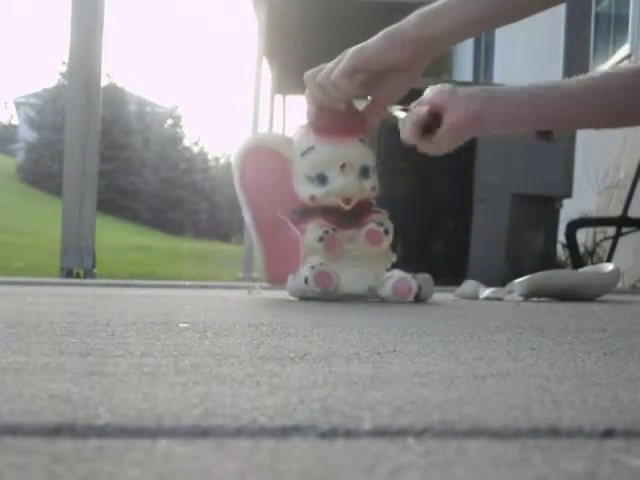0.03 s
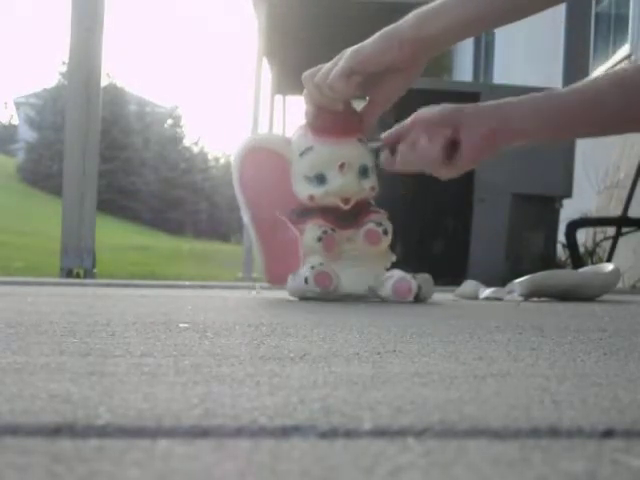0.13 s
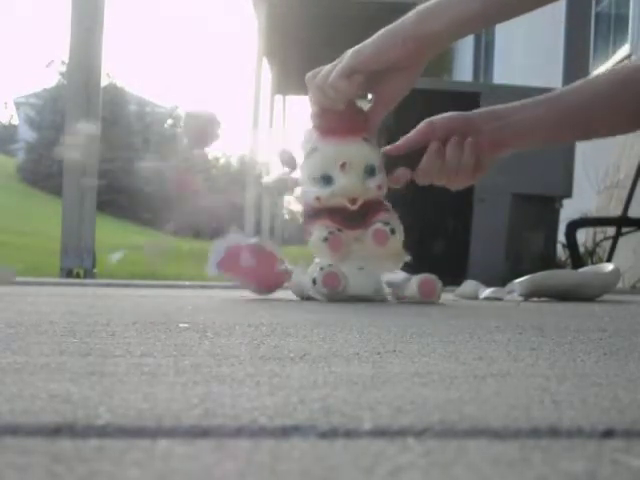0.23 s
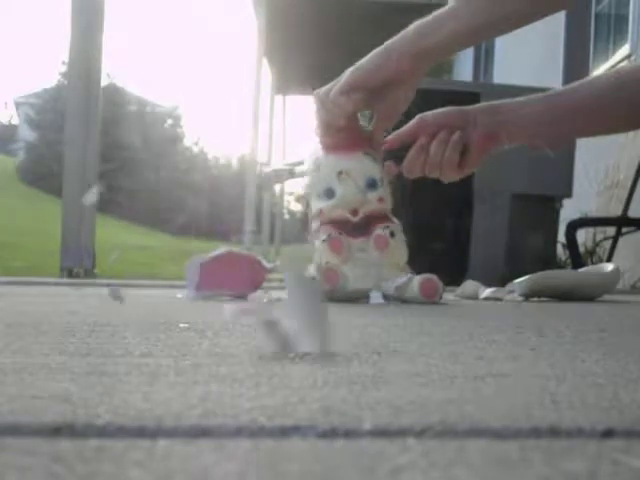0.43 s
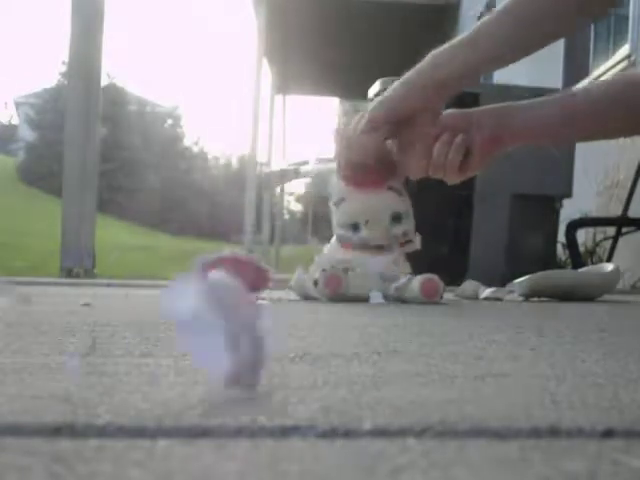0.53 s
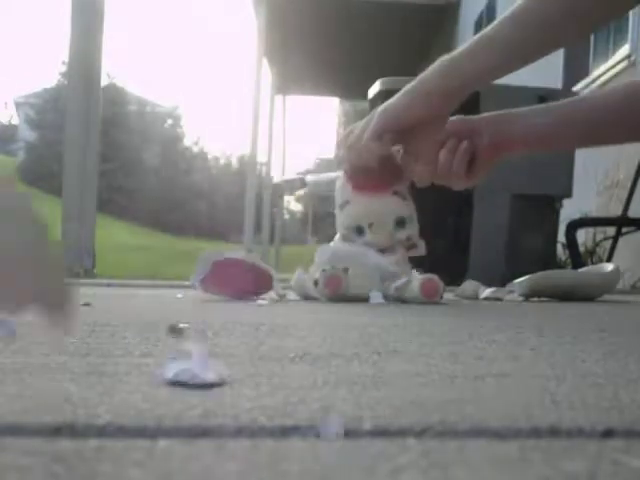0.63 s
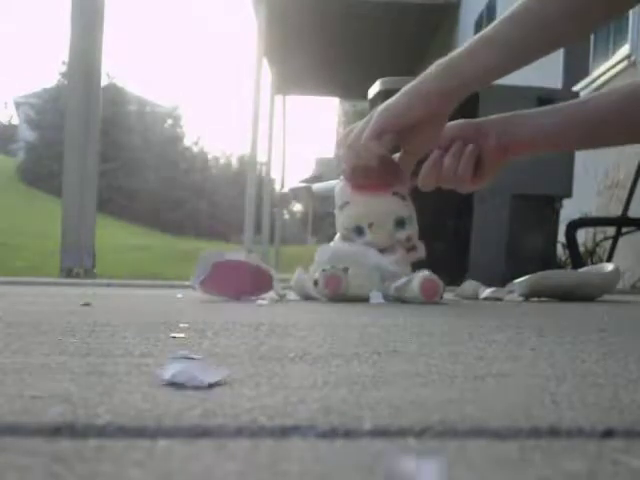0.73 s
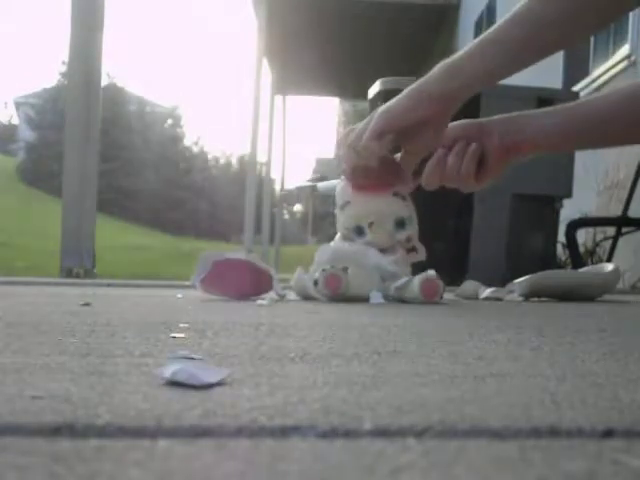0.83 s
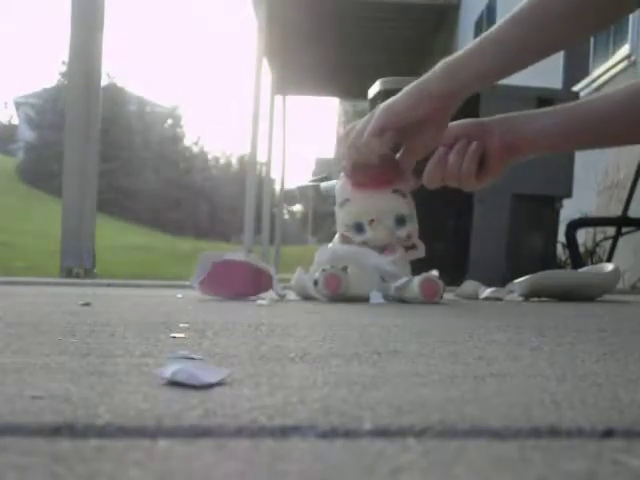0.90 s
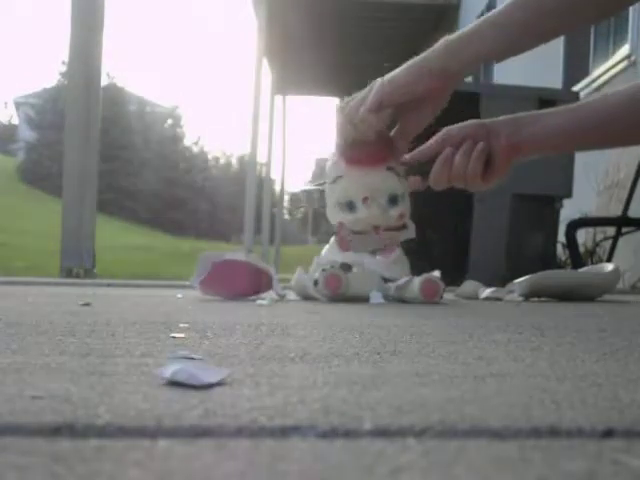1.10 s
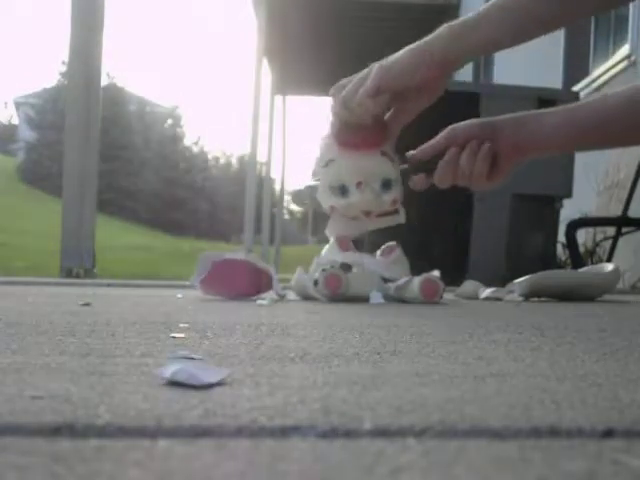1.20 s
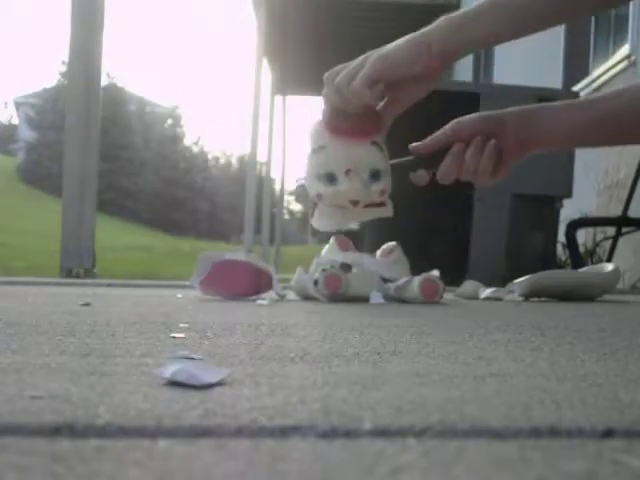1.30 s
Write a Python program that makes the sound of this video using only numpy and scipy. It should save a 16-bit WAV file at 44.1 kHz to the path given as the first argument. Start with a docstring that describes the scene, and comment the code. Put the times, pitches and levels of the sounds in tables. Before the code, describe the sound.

A hollow ceramic figurine breaks with one sharp crack. Shards clink and grit scatters on a concrete patio as a short echo returns. The dull microphone briefly overloads, with a faint cricket and low outdoor rumble behind.

```python
"""A cricket chirps over a low outdoor rumble. Then a hollow ceramic figurine bursts on a concrete
patio: a sharp crack, with a push of air that overloads the dull microphone. The shell rings briefly
while small chips tick, grit rains down and shards clink on the slab. The bang comes back from the
houses, the last pieces land, and the cricket chirps on."""
import sys
import numpy as np
from scipy import signal
from scipy.fft import rfft, irfft
from scipy.io import wavfile
from scipy.ndimage import uniform_filter1d

SR = 44100
rng = np.random.default_rng(int(sys.argv[2]) if len(sys.argv) > 2 else 0)


def persist_wave(psi):
    """Save psi, clipped to +-1, as 16-bit WAV."""
    counts = np.round(np.clip(psi, -1, 1) * 32767).astype(np.int16)
    wavfile.write(sys.argv[1], SR, np.atleast_2d(counts).T)


N = 59535
T = np.arange(N) / SR
BREAK_S = 0.2202

# tone colour of the outdoor background: (frequency [Hz], relative level [dB])
AIR_COLOUR = [(15, 0), (28, -0.5), (45, -6), (66, 2), (95, -13), (128, -6), (180, -15), (300, -22.5),
              (600, -28.5), (1200, -28), (2500, -40), (4800, -40.5), (7000, -30.5)]
# cricket chirps: (time [s], level [dB])
CRICKET_CHIRPS = [(0.077, -55.5), (0.623, -56.5), (1.095, -58)]
# ringing tones of the hollow shell: (pitch [Hz], relative level [dB], time to fade by 60 dB [s])
SHELL_TONES = [(591.7, -7.5, 0.086), (918, 3.5, 0.083), (1133, -8, 0.22), (1206, -7, 0.047),
               (1508, -2, 0.11), (1624, -5, .17), (1825, -9.5, .13), (2034, 5, 0.11), (2275, 1.5, 0.15),
               (2342, -2.5, .13), (2498, -3.5, 0.16), (2827, -2, 0.15), (3106, -1, 0.07),
               (3324, -7.5, 0.13)]
# tone colour of the bang washing around the patio: (frequency [Hz], relative level [dB])
WASH_COLOUR = [(100, -28), (330, -8.5), (420, -8), (800, -7), (1100, -3), (1500, -6.5), (2300, -4.5),
               (3300, -8.5), (5000, -10), (7000, -10)]
# chips ticking on the concrete: (time [s], level [dB], pitch [Hz])
CHIP_TICKS = [(0.2235, 8, 1400), (.2426, -5, 2160), (0.432, -7.5, 2260), (0.4324, -14.5, 3070),
              (0.4369, -15.5, 2300), (0.444, -15.5, 2300), (0.5734, -10.5, 3400), (0.5862, -17.5, 3300),
              (.6275, -29, 3500), (.6380, -23.5, 3510), (0.6492, -21, 2450), (0.7879, -13.5, 3800),
              (0.8194, -27.5, 4030), (0.8382, -33, 3800), (0.843, -28.5, 3060), (0.848, -32, 3200),
              (0.8887, -16, 2020), (.9170, -37, 3300), (.9455, -20, 2400), (1.0533, -20.5, 3200),
              (1.2416, -29, 2200), (1.2435, -19, 3490), (1.288, -38.5, 3500)]
# loudness of the falling grit: (time [s], level [dB])
GRIT_LEVELS = [(.2, -69), (.23, -45), (.3, -43), (.39, -69), (.44, -43), (.5, -49.5), (.56, -42.5),
               (.7, -66.5), (.84, -72.5), (.98, -73), (1.04, -64), (1.12, -67), (1.35, -74)]
# shards clinking: (time [s], level [dB], pitch [Hz], fade time [s], roughness [0-1])
SHARD_HITS = [(0.2328, -17.5, 2190, 0.066, 0.42), (0.2419, -18, 4500, 0.0075, 0.2),
              (0.2974, -29.5, 4900, 0.026, 0.65), (0.3112, -25.5, 1930, 0.036, 0.11),
              (0.3118, -27, 3500, 0.023, 0.47), (0.375, -40.5, 1970, 0.069, 0.23),
              (0.4208, -35, 4560, 0.021, 0.66), (.4210, -36, 3390, .025, 0.25),
              (.4460, -31.5, 2284, 0.04, .7), (0.4766, -38, 4680, 0.032, 0.65),
              (0.4894, -30, 3876, 0.038, 0.3), (0.489, -31, 2860, 0.024, 0.54),
              (0.5123, -23.5, 4320, .022, 0.32), (0.514, -19.5, 3055, 0.027, 0.03),
              (0.5262, -25.5, 4840, 0.024, 0.7), (0.5285, -21.5, 4320, 0.017, 0.4),
              (0.5307, -20, 3500, 0.024, 0.35), (0.5515, -28, 4150, 0.023, 0.03),
              (0.564, -31, 1960, .02, 0.43), (0.663, -46, 2000, 0.079, 0.3),
              (0.8423, -46.5, 1500, 0.024, 0.63), (0.8891, -32, 2530, 0.0064, 0.2),
              (.8945, -47.5, 2260, 0.13, 0.8), (1.028, -37, 1220, 0.045, 0.55),
              (1.0310, -42, 1600, 0.097, 0.31), (1.0319, -40.5, 2460, 0.038, 0.5),
              (1.0290, -43.5, 3540, 0.062, 0.43), (1.0630, -41, 545, 0.013, .3),
              (1.0650, -44.5, 327, 0.1, 0.25), (1.148, -50, 1200, .05, 0.32),
              (1.1500, -52, 3930, .04, 0.73)]
# echoes from walls and houses: (peak time [s], level [dB], rise time [s], fade time [s])
WALL_ECHOES = [(0.436, -48.5, .006, 0.37), (0.533, -33, .016, 0.33), (0.576, -42, .012, 0.21)]
# tone colour of those echoes: (frequency [Hz], relative level [dB])
WALL_COLOUR = [(100, -42.5), (300, -4), (450, -14), (600, -2.5), (850, -5.5), (1250, 5.5), (1700, -8.5),
               (2600, -7.5), (4200, -5.5), (6000, -10)]
# tones that hang in the far echo: (pitch [Hz], level [dB], fade time [s])
FAR_TONES = [(597, -40, 0.26), (1212, -42.5, 0.25), (1266, -44.5, 0.33), (3610, -34, 0.06),
             (4215, -52, 0.16)]
# how the microphone dulls the treble: (frequency [Hz], gain [dB])
MIC_RESPONSE = [(4000, 0), (4950, 0), (5250, -6.5), (5500, -18), (5950, -19), (6300, -56.5), (7500, -76)]


def from_db(db):
    """Turn decibels into a number to multiply by."""
    return 10 ** (np.asarray(db) / 20)


def unit_level(x):
    """Scale a sound so its average level (rms) is 1."""
    return x / np.sqrt(np.mean(x ** 2) + 1e-20)


def noise(colour):
    """Noise with the given tone colour, at level 1."""
    hz, db = np.transpose(colour)
    freqs = np.maximum(np.arange(N + 1) * SR / (2 * N), 1)
    gain = from_db(np.interp(np.log(freqs), np.log(hz), db))
    return unit_level(irfft(rfft(rng.standard_normal(2 * N)) * gain)[:N])


def dying(start, fade):
    """Start suddenly, then drop by 60 dB every `fade` seconds."""
    return (T >= start) * np.exp(-np.log(1000) * np.clip((T - start) / fade, 0, 10))


def swell(peak, rise, fade):
    """Grow until the peak time, then die away."""
    return np.where(T < peak, np.exp(-np.minimum(abs(T - peak) / rise, 20)), dying(peak, fade))


def ring(start, hz, fade):
    """One fading tone of a struck object."""
    return dying(start, fade) * np.sin(2 * np.pi * hz * (T - start))


def background(hum_hz=128):
    """Low outdoor rumble, faint hiss and a distant hum."""
    return from_db(-49.5) * noise(AIR_COLOUR) + from_db(-60) * np.sin(2 * np.pi * hum_hz * T)


def cricket(pitch_hz=4660, waver_hz=32.1, gap_s=0.048, width_s=0.01):
    """Each chirp is three pulses of one wavering tone, the first one softer."""
    level = sum(from_db(db + pulse_db) * np.exp(-0.5 * ((T - start - k * gap_s) / width_s) ** 2)
                for start, db in CRICKET_CHIRPS for k, pulse_db in enumerate([-6, 0, 0]))
    waver = unit_level(uniform_filter1d(rng.standard_normal(N), size=150))
    return level * np.sin(2 * np.pi * np.cumsum(pitch_hz + waver_hz * waver) / SR)


def burst():
    """The figurine cracks with a brittle snap, its shell rings, and the bang bounces around nearby."""
    crack = from_db(8) * ring(BREAK_S, hz=1600, fade=0.0023)
    snap = from_db(-2) * ring(BREAK_S, hz=3300, fade=0.00098)
    shell = sum(rng.choice([-1, 1]) * from_db(db - 22.5) * ring(BREAK_S + rng.uniform(0, .002), hz, fade)
                for hz, db, fade in SHELL_TONES)
    wash_level = from_db(-12) * dying(BREAK_S, fade=0.12) + from_db(-30.5) * dying(BREAK_S, fade=0.43)
    return crack + snap + shell + wash_level * noise(WASH_COLOUR)


def air_push(rise_s=0.0008, fall_s=0.0054, leak_hz=0.6):
    """The burst pushes the air once; the pressure then dips just below normal and slowly returns."""
    age = np.maximum(T - BREAK_S - 0.00023, 0)
    push = 1.19 * (1 - np.exp(-age / rise_s)) * np.exp(-np.minimum(age / fall_s, 20))
    return signal.sosfilt(signal.butter(1, leak_hz, "high", fs=SR, output="sos"), push)


def chips(cycles=2.9):
    """Ticks that die within a few vibrations; small chips give off little bass."""
    ticks = 0
    for start, db, hz in CHIP_TICKS:
        bass_cut = signal.butter(1, 0.68 * hz, "high", fs=SR, output="sos")
        ticks += from_db(db) * signal.sosfilt(bass_cut, ring(start, hz, fade=cycles / hz))
    return ticks


def grit(hits_per_s=1300, spread_db=3.5, pitches=14, cycles=9):
    """Tiny grains land at random, each ringing briefly at one of several pitches."""
    sizes = from_db(spread_db * np.minimum(rng.exponential(1, N), 4)) * rng.choice([-1, 1], N)
    clicks = sizes * (rng.random(N) < hits_per_s / SR)
    pitch_choice = rng.integers(0, pitches, N)
    rain = 0
    for k, hz in enumerate(np.geomspace(1700, 5200, pitches)):
        decay = np.exp(-np.log(1000) * hz / (cycles * SR))
        angle = 2 * np.pi * hz / SR
        feedback = [1, -2 * decay * np.cos(angle), decay ** 2]  # makes each click ring
        rain += signal.lfilter([0, np.sin(angle)], feedback, clicks * (pitch_choice == k) + 1e-18)
    return unit_level(rain) * from_db(np.interp(T, *np.transpose(GRIT_LEVELS)))


def clink(start, hz, fade, rough):
    """A main tone, a weaker higher one, and the crunch of a broken edge chattering on the slab."""
    band = signal.butter(2, [hz / 1.35, hz * 1.35], "band", fs=SR, output="sos")
    crunch = unit_level(signal.sosfilt(band, rng.standard_normal(N))) * dying(start, fade)
    tones = ring(start, hz, fade) + from_db(-14.5) * ring(start, 1.2 * hz, fade / 2)
    return (1 - rough) * tones + rough * from_db(-0.5) * crunch


def shards():
    """Larger pieces land and knock together."""
    return sum(from_db(db) * clink(start, hz, fade, rough) for start, db, hz, fade, rough in SHARD_HITS)


def patio(sound):
    """Add the faint, short reflections from the walls and the deck overhead."""
    tail = rng.standard_normal(N) * dying(start=0.0013, fade=0.23)
    tail /= np.sqrt(np.sum(tail ** 2))
    return sound + from_db(-17) * signal.fftconvolve(sound, tail)[:N]


def echoes(far_peak_s=0.5466, far_rise_s=0.022):
    """The bang comes back from the houses smeared, with a few tones hanging in it."""
    wash = sum(from_db(db) * swell(peak, rise, fade) * noise(WALL_COLOUR)
               for peak, db, rise, fade in WALL_ECHOES)
    tones = sum(from_db(db) * swell(far_peak_s, far_rise_s, fade)
                * np.sin(2 * np.pi * (hz * T + rng.random())) for hz, db, fade in FAR_TONES)
    return wash + tones


def scene():
    """Mix the garden, the break, the falling pieces and the echoes into one channel."""
    mix = background() + cricket() + burst() + air_push() + patio(chips() + grit() + shards()) + echoes()
    return mix[None]


def record(dry, overload=0.79, hiss_db=-101, cutoff_hz=17500):
    """A dull microphone overloads on the crack and adds faint hiss; the highest treble is cut."""
    freqs = np.arange(N + 1) * SR / (2 * N)
    gain = from_db(np.interp(freqs, *np.transpose(MIC_RESPONSE)))
    mirrored = np.hstack([dry, dry[:, ::-1]])  # avoids clicks at the ends
    dull = irfft(rfft(mirrored) * gain)[:, :N]
    clipped = dull / (1 + (dull / overload) ** 16) ** (1 / 16)
    hiss = from_db(hiss_db) * rng.standard_normal(N)
    return signal.sosfilt(signal.cheby2(12, 70, cutoff_hz, fs=SR, output="sos"), clipped + hiss)


dry = scene()
out = record(dry)
persist_wave(out)
```